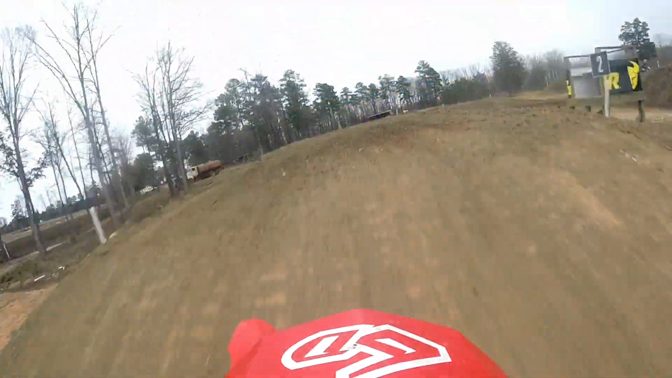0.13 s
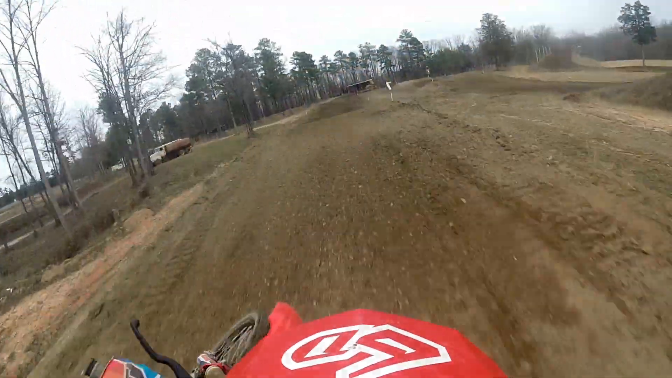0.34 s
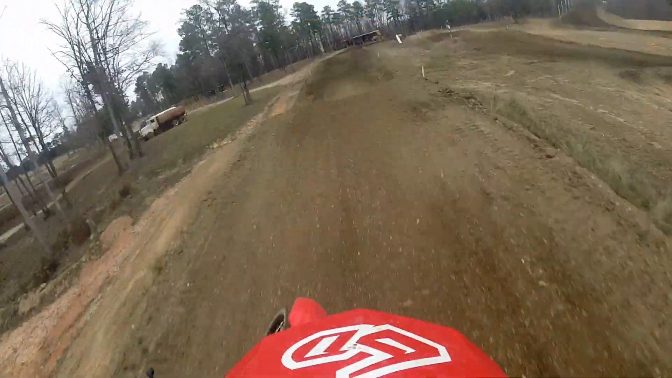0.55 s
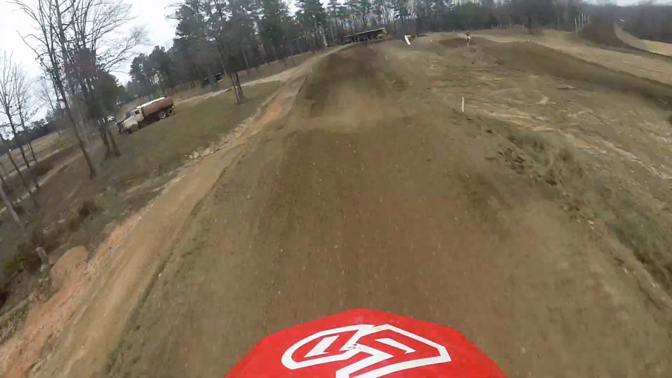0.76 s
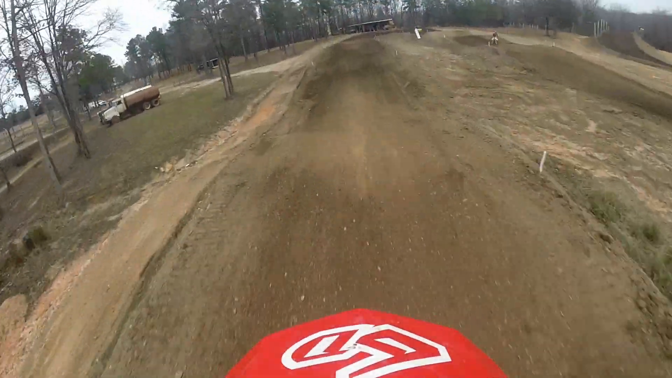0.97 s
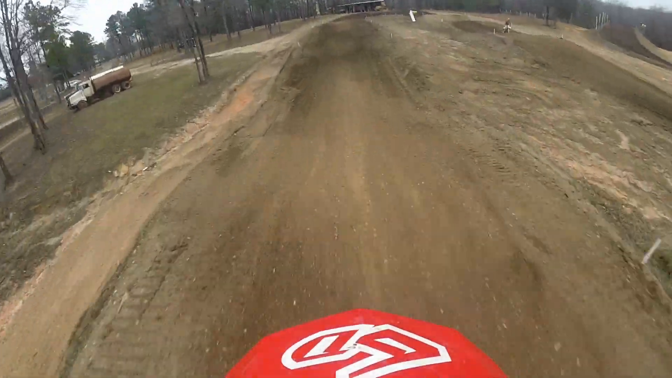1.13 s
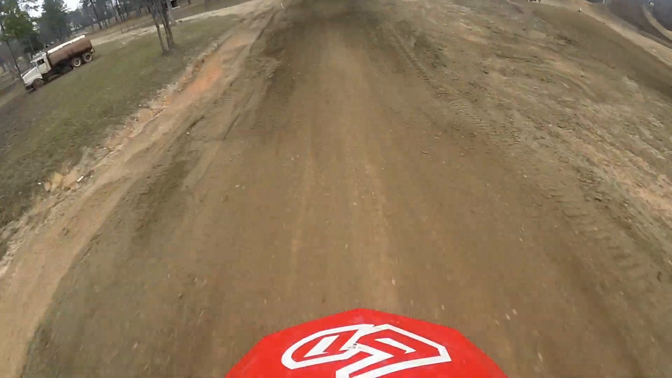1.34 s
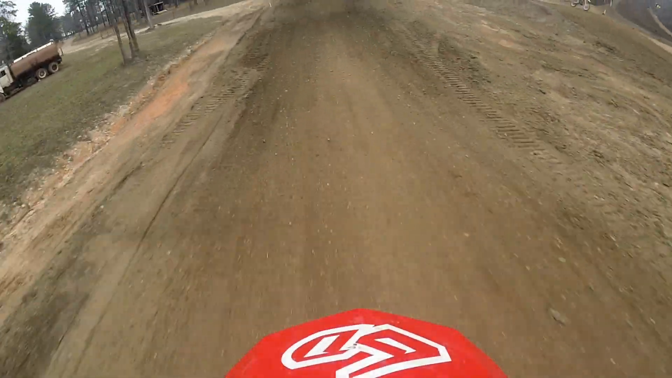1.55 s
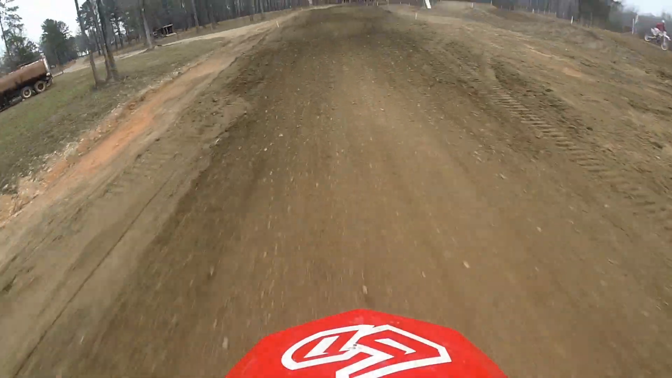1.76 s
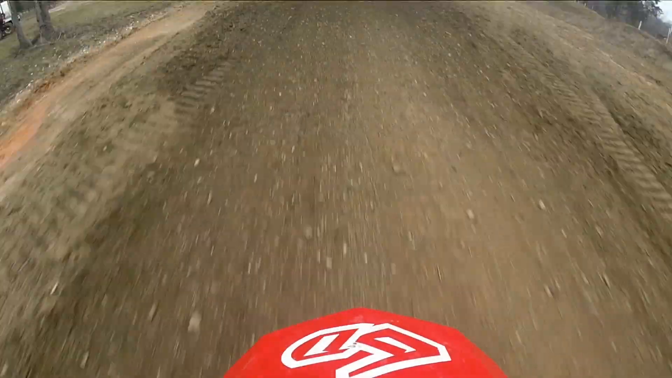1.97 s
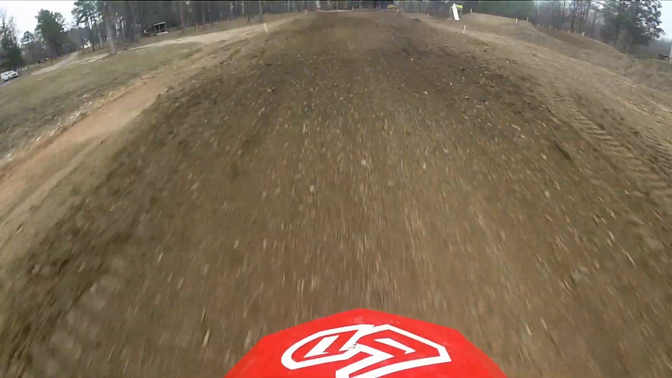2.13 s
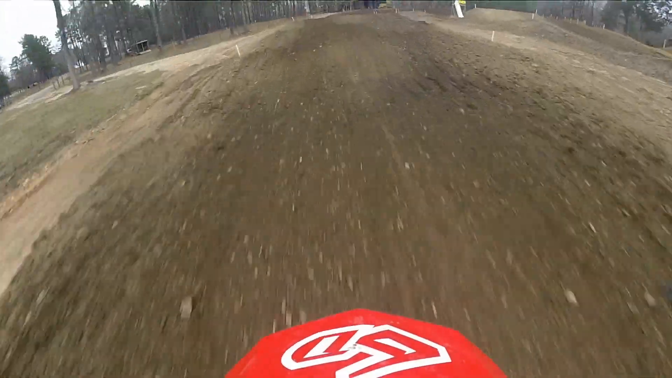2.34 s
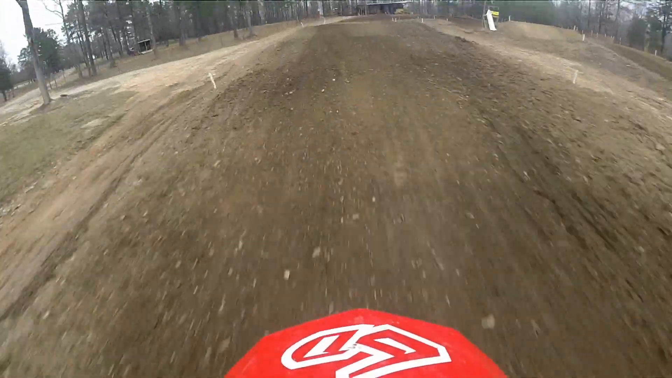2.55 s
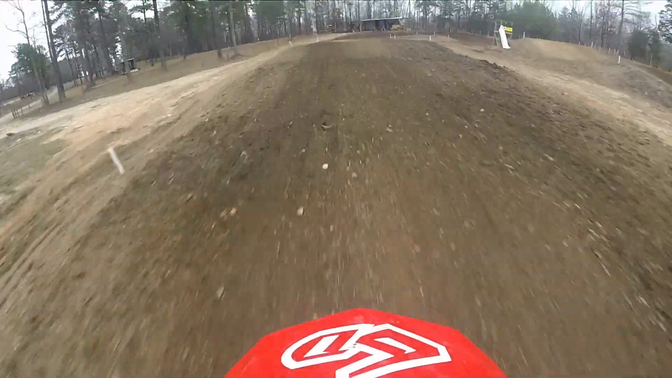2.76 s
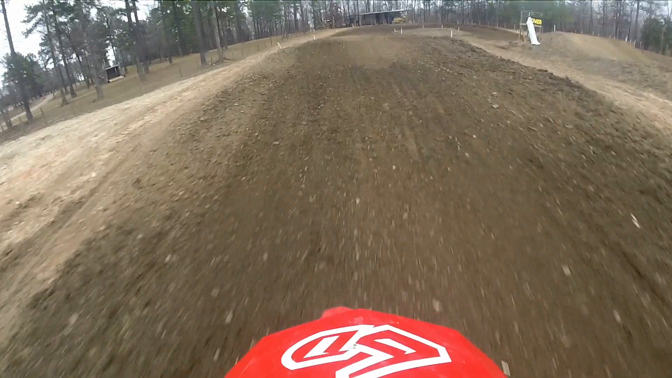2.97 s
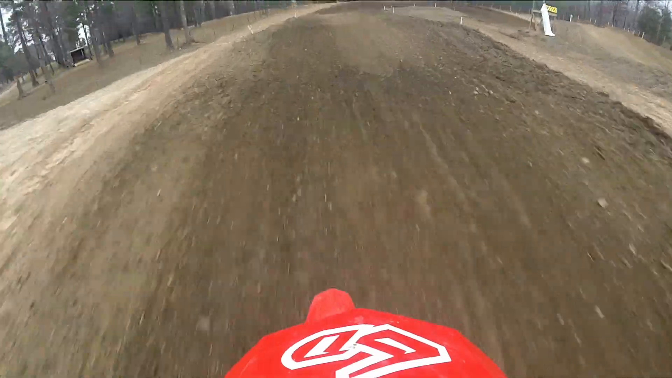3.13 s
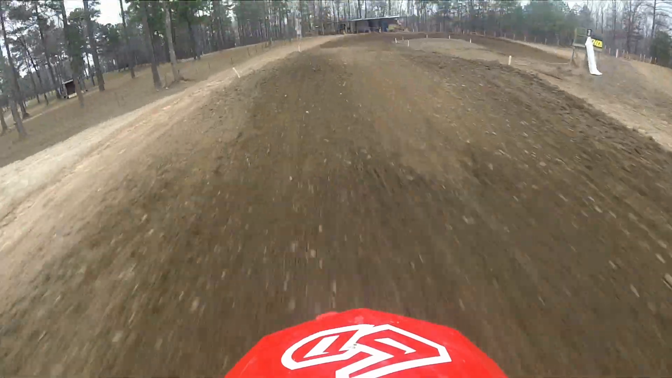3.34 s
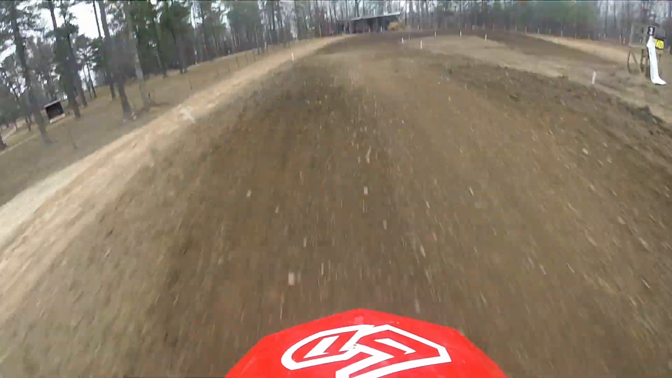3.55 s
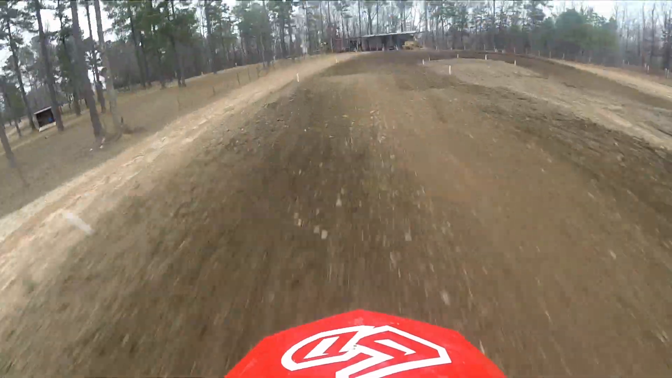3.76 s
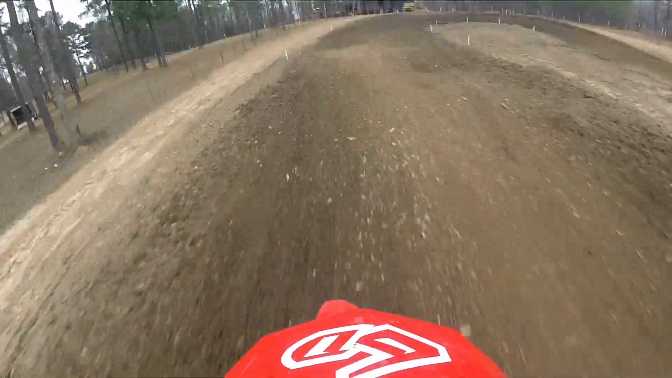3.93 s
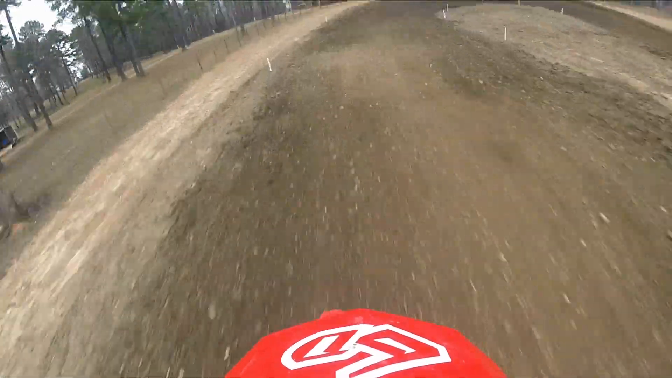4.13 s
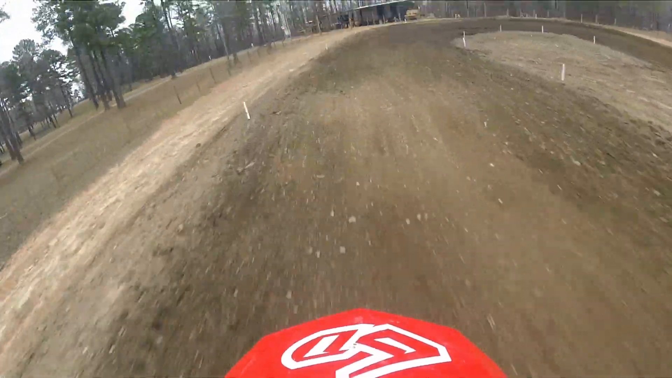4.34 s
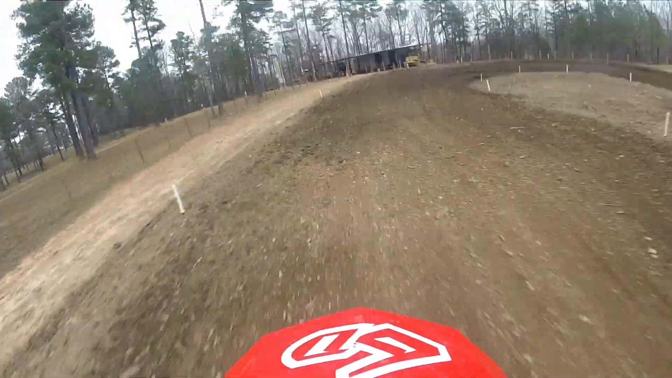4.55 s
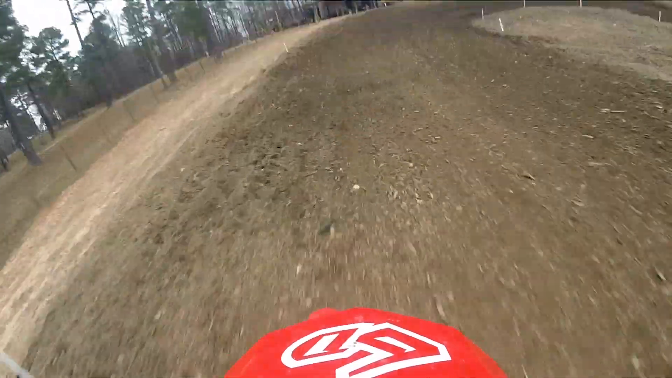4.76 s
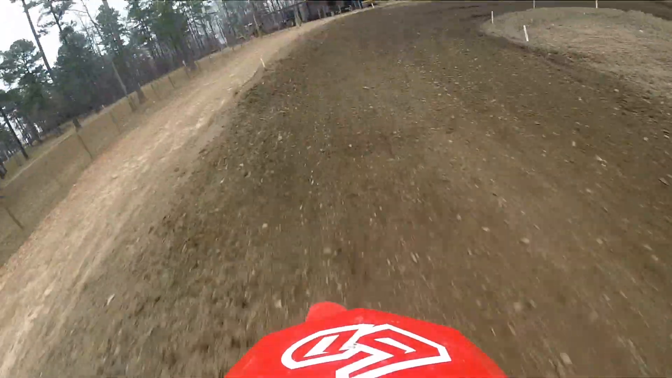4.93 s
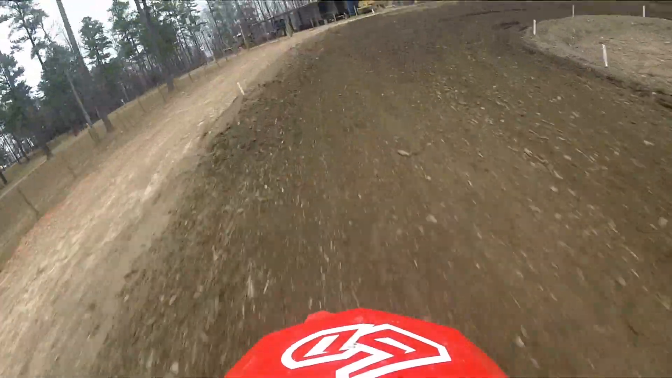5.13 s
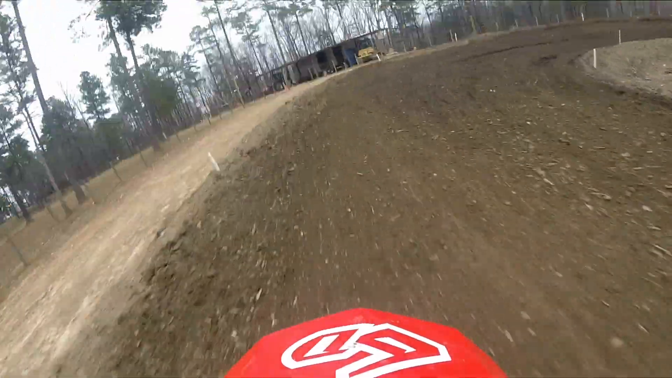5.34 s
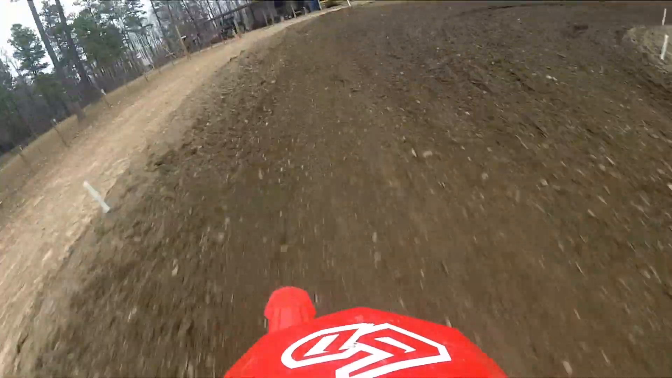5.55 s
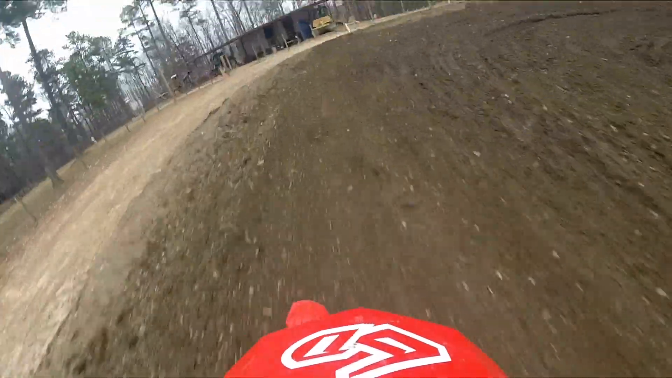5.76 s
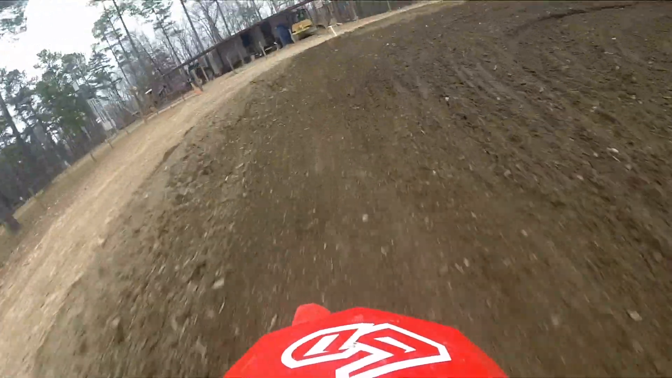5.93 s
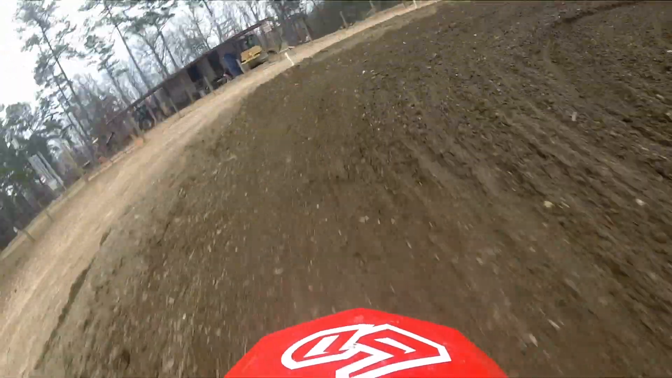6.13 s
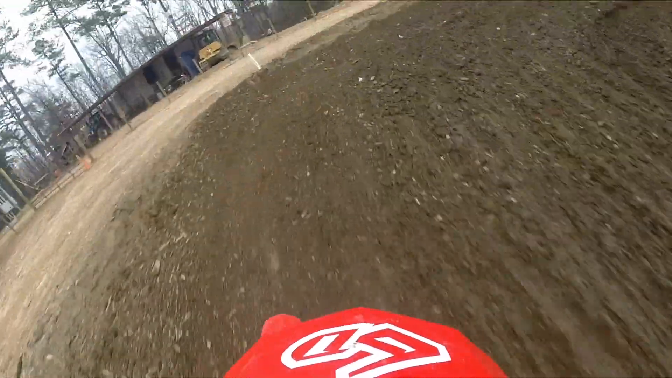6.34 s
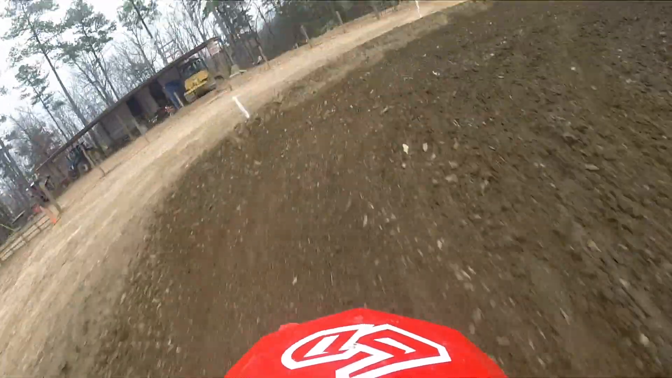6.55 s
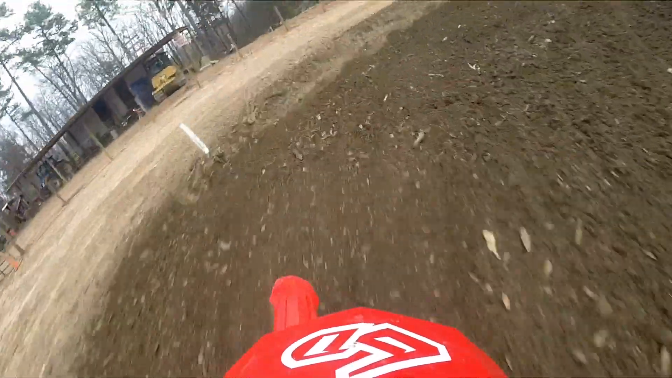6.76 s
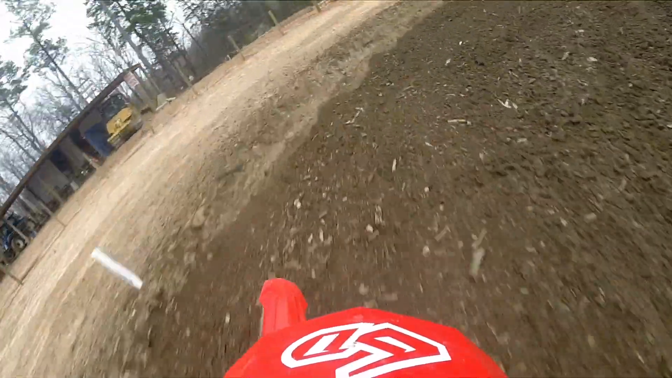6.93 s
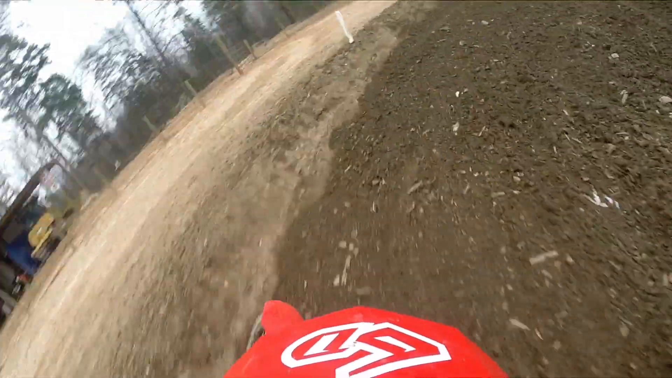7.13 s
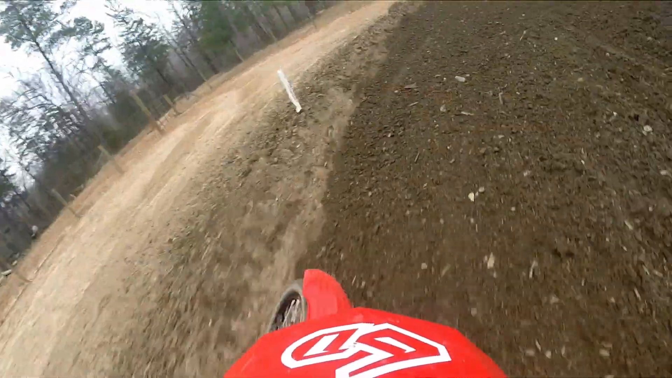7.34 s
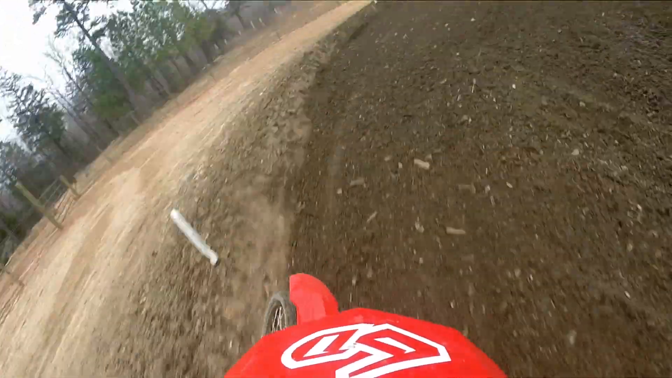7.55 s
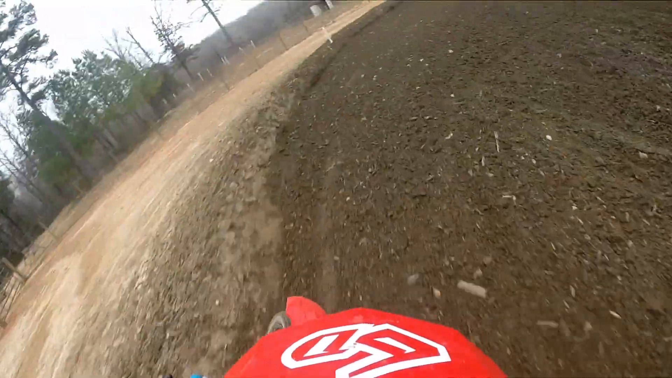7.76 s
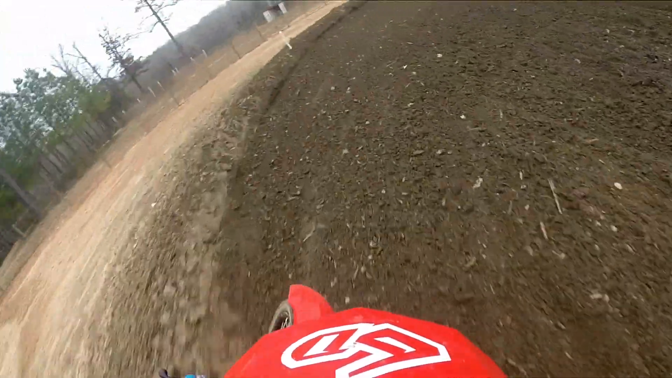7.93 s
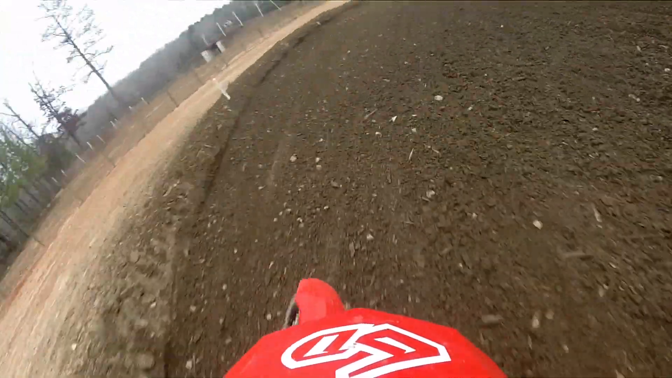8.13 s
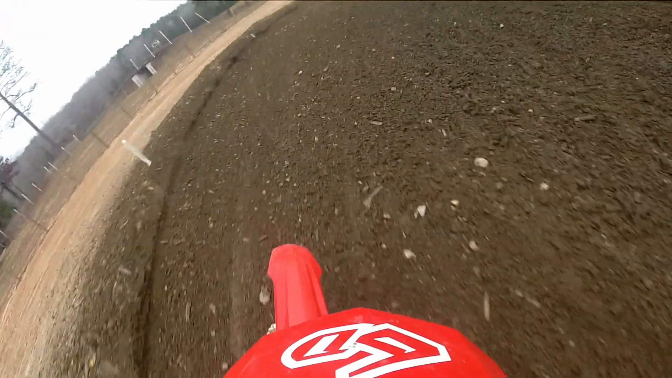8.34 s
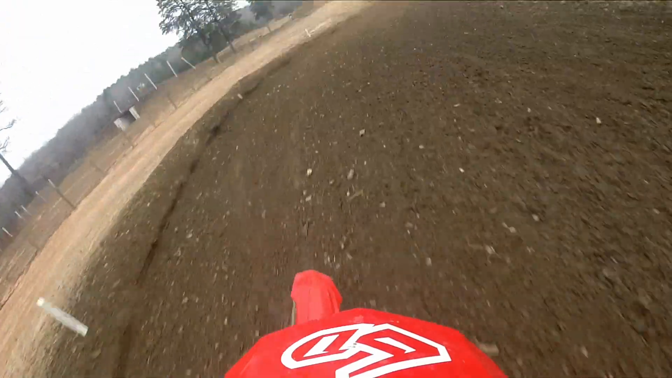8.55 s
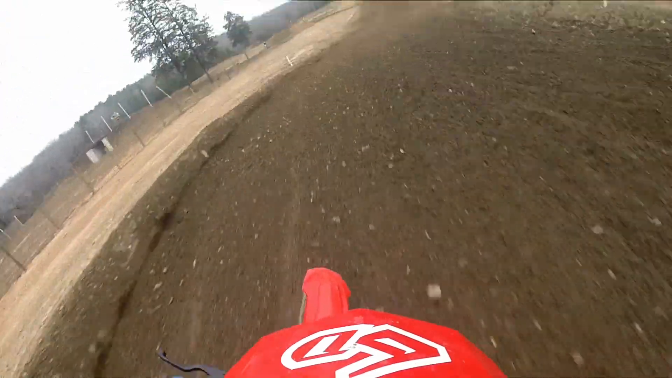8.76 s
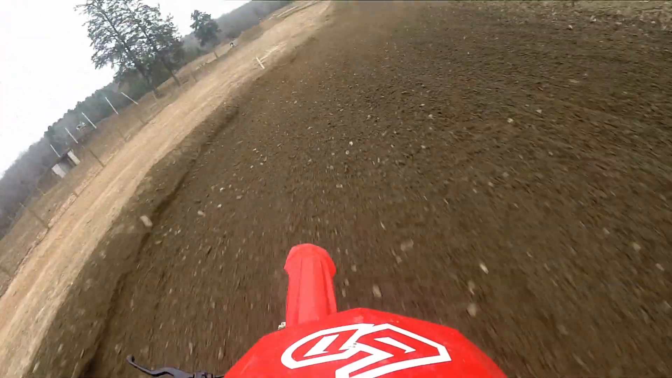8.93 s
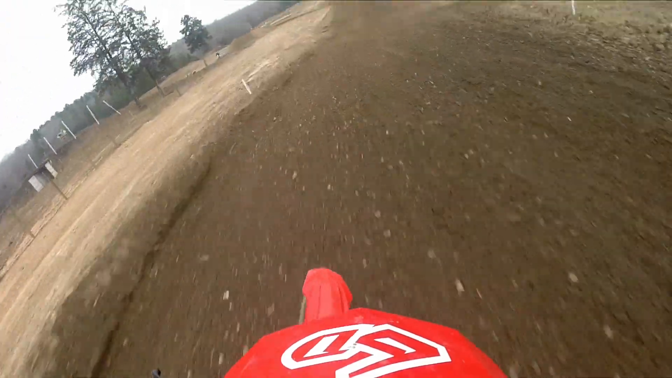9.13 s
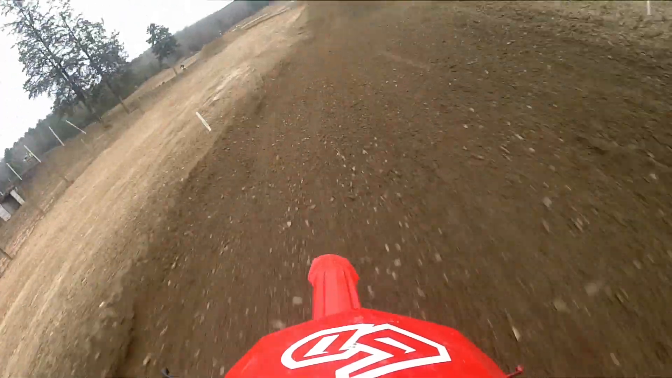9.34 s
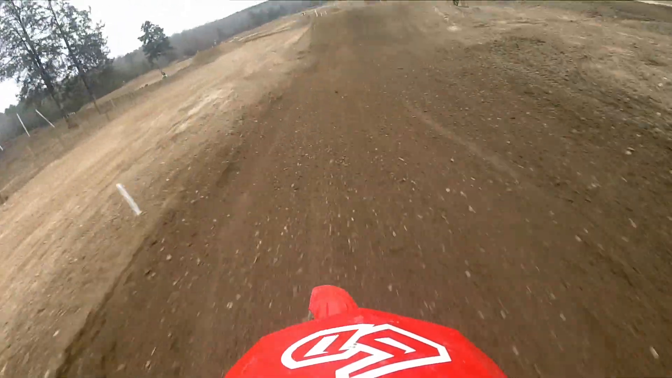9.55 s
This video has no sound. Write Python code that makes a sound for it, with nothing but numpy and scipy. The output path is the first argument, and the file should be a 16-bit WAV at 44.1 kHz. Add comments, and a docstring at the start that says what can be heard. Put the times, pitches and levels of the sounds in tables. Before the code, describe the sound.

A single-cylinder four-stroke motocross bike on a dirt track is heard close, from the rider's helmet. From the start the engine drones with falling revs and rattling valves, while air and tyres hiss and wind gusts rumble. At 0.8 seconds it gives a short, crackling blip in mid-air. From 1.3 to 3.7 seconds it revs high in quick repeated pulls, each with an exhaust bark and a hollow intake honk. Bumps make low thumps near 1.8, 2.9, 3.8 and 4.6 seconds. From about 4 seconds the bike coasts into a bend, burbling low with light throttle blips, and the hiss fades after 5.5 seconds. More thumps come around 6.2, 6.6 and 8.4 seconds, and faint grit ticks on the helmet a few times between 6 and 9. From about 8 seconds the engine lugs out in stronger surges through a heavy gust, climbing until the end near 9.7 seconds.

```python
"""A single-cylinder four-stroke motocross bike on a dirt track, heard from the rider's helmet.
From the start the pipe drones with revs and throttle, valves rattle, air and tyres hiss and gusts rumble.
At 0.8 s the bike blips in the air and crackles. It pulls over the rollers: each pull makes the exhaust
bark and the airbox honk, and bumps thump the helmet. From about 4 s it coasts into a bend, grit ticks
on the shell after 6 s, and from about 8 s the engine lugs out of the bend."""
import sys
import numpy as np
from scipy import signal
from scipy.fft import rfft, irfft, next_fast_len
from scipy.io import wavfile
from scipy.ndimage import uniform_filter1d

SR = 44100
rng = np.random.default_rng(int(sys.argv[2]) if len(sys.argv) > 2 else 0)


def file_out(sig):
    """Save sig as 16-bit WAV at sys.argv[1]."""
    # one column per channel
    cols = np.atleast_2d(sig).T
    # limit, then scale
    lim = np.clip(cols, -1, 1)
    pcm = np.round(lim * 32767).astype(np.int16)
    wavfile.write(sys.argv[1], SR, pcm)


N = 427329
T = np.arange(N) / SR
FFT_SIZE = next_fast_len(N + SR)
FREQ_HZ = np.maximum(np.arange(FFT_SIZE // 2 + 1) * SR / FFT_SIZE, 1e-3)


def undb(db):
    """Decibels to gain."""
    return 10 ** (np.asarray(db) / 20)


def curve(table, column=1, at=T):
    """One column interpolated against the first, by default over time."""
    rows = np.array(table, float)
    return np.interp(at, rows[:, 0], rows[:, column])


def swell(start, length, attack, release):
    """Envelope that rises, holds and falls; times in seconds."""
    return np.clip((T - start) / attack, 0, 1) * np.clip(1 - (T - start - length) / release, 0, 1)


def noise():
    """White noise of unit power."""
    return rng.standard_normal(N)


def wander(rate_hz):
    """Smooth random motion with a spread near 1."""
    knots = rng.standard_normal(4000)
    return 1.4 * np.interp(T * rate_hz, np.arange(len(knots)), knots)


def modes(table, order=1):
    """Response of (Hz, width Hz, dB) resonances; above order 1 each swells before it fades."""
    return sum(undb(db) / (1 + 1j * (FREQ_HZ / hz - hz / FREQ_HZ) * hz / width) ** order
               for hz, width, db in table)


def colour(spectrum):
    """Causal response through (Hz, dB) points."""
    hz, db = np.transpose(spectrum)
    gain = undb(np.interp(np.log(FREQ_HZ), np.log(hz), db))
    cepstrum = irfft(np.log(gain), FFT_SIZE)
    return np.exp(rfft(2 * cepstrum[:FFT_SIZE // 2], FFT_SIZE) - cepstrum[0])


def through(x, response):
    """Filter that keeps the power of a white input."""
    return irfft(rfft(x, FFT_SIZE) * response, FFT_SIZE)[:N] / np.sqrt(np.mean(abs(response) ** 2))


def steady(x):
    """Hold unit power over a few engine cycles."""
    window = SR // 10
    power = uniform_filter1d(uniform_filter1d(x * x, window), window)
    return x / np.sqrt(power + 1e-12)


def clicks(times, sizes):
    """Impulses at times in seconds."""
    return np.bincount(np.clip(np.asarray(times) * SR, 0, N).astype(int), sizes, N + 1)[:N]


# Each row: time in seconds, firing rate in Hz.
FIRING_HZ = [(0.0, 69.8), (0.28, 61.1), (0.83, 37.27), (0.94, 66), (1.06, 64.3), (1.34, 53.14),
             (1.61, 91.1), (1.72, 98.8), (1.82, 63.64), (1.97, 65.23), (2.03, 67.2), (2.41, 67.38),
             (2.84, 88.2), (2.98, 62.4), (3.09, 77.6), (3.31, 74.3), (3.48, 62.66), (3.67, 91.75),
             (3.79, 61.57), (4.18, 45.24), (4.44, 38.77), (4.52, 39.74), (4.73, 50.24), (4.99, 35.37),
             (5.28, 27.95), (5.44, 45.3), (5.77, 29.8), (6.18, 26.41), (6.4, 53.47), (6.64, 36.61),
             (7.09, 23.74), (7.3, 49.8), (7.56, 25), (7.89, 56.87), (8.02, 36.06), (8.11, 36.29),
             (8.39, 35.37), (8.45, 39.93), (8.74, 44.3), (8.84, 39.38), (9.03, 40.68), (9.22, 53.28),
             (9.41, 46.52), (9.58, 56.4), (9.69, 64.7)]


def engine_cycles(revs_hz):
    """Cycle count, whole at each firing. Slow running stumbles; the flywheel evens out fast running."""
    stumble = .008 * (40 / revs_hz) ** 3 * wander(30)
    return np.cumsum(revs_hz) / SR + stumble


def strokes(cycle, phase, scatter_db):
    """One pulse a cycle. The scatter holds at 50 Hz; slower running burns less evenly."""
    chance = rng.standard_normal(1000)
    counts = np.arange(int(cycle[-1]))
    times = np.interp(counts + phase, cycle, T)
    period_s = np.gradient(times)
    uneven_db = scatter_db * (50 * period_s) ** 1.5 * chance[counts]
    return clicks(times, np.sqrt(period_s * SR) * undb(uneven_db))


def puffs(cycle, phase, decay):
    """Unit-power noise that swells and dies once a cycle; phase and decay in cycles."""
    age = ((cycle - phase) % 1) / decay
    gate = age * np.exp(-age)
    return noise() * gate / np.sqrt(np.mean(gate ** 2))


# Each row: start, length and attack in seconds, opening 0-1, then relative levels in dB of
# exhaust bark, airbox honk, pulse sharpness, spit of gas and upper airbox mode.
THROTTLE_PULLS = [(0.818, 0.12, .03, 0.56, -41.5, -43, -5.5, 3.5, -0.5),
                  (1.347, 0.23, .06, 1, -35.5, -42.5, -10, -19, -2),
                  (1.583, 0.17, .03, 0.9, -44, -39, -2.5, -25, 7),
                  (1.77, 0.33, 0.032, 0.96, -46.5, -38, -3, -18, 1.5),
                  (2.099, .3, 0.09, 0.9, -45.5, -38, -3, -2, -4),
                  (2.41, 0.26, 0.027, 0.65, -50, -52, -4, -5, -1),
                  (2.66, 0.16, 0.052, 0.93, -46.5, -41, -3, -6, 21),
                  (2.906, 0.17, .04, 0.96, -46, -41, -6, -12, -5.5),
                  (3.079, 0.26, .03, 0.75, -47.5, -48.5, -6.5, -10, -9),
                  (3.438, .13, 0.041, 1, -42, -36, 3, -18, 0),
                  (3.57, 0.092, 0.037, 1, -47, -37, 4.5, -18, 4),
                  (4.63, .24, .04, .2, -66, -52.5, -2, -5, 6),
                  (5.34, 0.23, 0.075, 0.29, -66, -61, 0, -3, 10),
                  (6.191, 0.36, 0.025, 0.42, -59, -52, 2, -4, 1.5),
                  (7.136, 0.089, .02, 0.67, -55.5, -47.5, -1, 0.5, 9),
                  (7.227, .16, 0.029, 0.3, -57, -52.5, 1.5, -4, 3),
                  (7.513, .23, 0.021, 0.47, -64, -48.5, 2, 2, 4),
                  (7.751, .18, 0.041, 1, -58, -46, 4.5, 0, -1),
                  (7.93, 0.29, 0.025, 0.83, -52, -39.5, 2.5, 1, -4),
                  (8.2, 0.26, .03, 1, -48.5, -37, -2.5, 2, -2),
                  (8.452, 0.302, 0.026, 1, -45.5, -35.5, 1, 0.5, -6),
                  (8.761, 0.27, 0.043, 0.99, -46, -38, -4, -1.5, -5.5),
                  (8.991, .27, .06, 1, -42, -35.5, -1, -4.5, -5.5),
                  (9.272, .23, 0.037, 0.97, -43, -36, 0.5, -5.5, -5.5),
                  (9.5, 0.27, .04, 0.89, -42.5, -40, 0.5, -8, -13)]
BARK, HONK, SHARPNESS, SPIT, UPPER_MODE = range(4, 9)
RELEASE_S = 0.038


def throttle():
    """Throttle opening, 0-1."""
    pulls = sum(opening * swell(start, length, attack, RELEASE_S)
                for start, length, attack, opening, *_ in THROTTLE_PULLS)
    return np.clip(pulls, 0, 1)


def pull_gain(column, crest, arch_db=2):
    """Gain that arches over each pull; crest is the share of the pull where the arch peaks."""
    gain = np.zeros(N)
    for row in THROTTLE_PULLS:
        start, length, attack = row[:3]
        progress = (T - start) / (length + RELEASE_S)
        droop_db = arch_db * np.minimum((2 * (progress - crest)) ** 2, 2)
        gain += undb(row[column] - droop_db) * swell(start, length, attack, RELEASE_S)
    return gain


def pull_tone(column):
    """Gain that colours each pull, gliding from one to the next."""
    return undb(curve([(row[0] + row[1] / 2, row[column]) for row in THROTTLE_PULLS]))


# Throttle shut. Each row: firing rate in Hz, relative levels in dB of pipe, can, cases and airbox.
COASTING_LEVELS = [(26.88, -61.5, -61.5, -71, -70), (33.6, -56.5, -62.5, -69, -65.5),
                   (45.7, -50, -63.5, -67, -58.5), (56, -55.5, -63, -64, -59), (67, -65.5, -71, -65, -57)]
# Throttle open. Each row: firing rate in Hz, relative dB of pipe, can and cases, idle-turn kick 0-1.
PULLING_LEVELS = [(32.985, -60, -57.5, -52.5, 0.14), (43.02, -59, -54, -51, 0.3),
                  (52, -62, -52.5, -55, 0.1), (66, -54, -64, -55, 0), (82, -46.5, -61, -51, 0.36)]
# Pipe and engine cases. Each row: frequency in Hz, gain in dB.
PIPE_SPECTRUM = [(50, -44.5), (95, -21.5), (122, 3), (143, 6.5), (168, 2.5), (210, -6.5), (300, -10.5),
                 (500, -49.5), (2000, -86)]
CASES_SPECTRUM = [(150, -47), (380, -4.5), (470, 3), (550, 2.5), (750, 0.5), (900, -2.5), (1300, -2),
                  (5000, -87)]
# Silencer can. Each row: frequency in Hz, width in Hz, gain in dB.
CAN_MODES = [(87.7, 42, 0)]


def drone(cycle, revs_hz):
    """Firings shake pipe, can and cases, burbling at low revs; the idle crank turn kicks too."""
    firing = strokes(cycle, phase=0, scatter_db=1.3)
    idle_turn = strokes(cycle, phase=.5, scatter_db=1.3)
    beat = firing + curve(PULLING_LEVELS, column=4, at=revs_hz) * idle_turn
    burble = (50 / revs_hz) ** 2 * noise()
    pipe = steady(through(beat + .12 * burble, colour(PIPE_SPECTRUM)))
    can = steady(through(firing + .2 * burble, modes(CAN_MODES, order=2)))
    spread = np.exp(-1j * np.pi * FREQ_HZ ** 2 * 6e-6)  # higher tones trail in the frame
    cases = steady(through(beat + .5 * burble, colour(CASES_SPECTRUM) * spread)) * undb(1.5)
    opening = throttle()
    mix = np.zeros(N)
    for column, part in enumerate((pipe, can, cases), start=1):
        shut_db = curve(COASTING_LEVELS, column, at=revs_hz)
        open_db = curve(PULLING_LEVELS, column, at=revs_hz)
        mix += part * undb((1 - opening) * shut_db + opening * open_db)
    return mix


# Airbox. Each row: frequency in Hz, width in Hz, gain in dB.
AIRBOX_LOW_MODES = [(269.6, 102, 1)]
AIRBOX_HIGH_MODES = [(324, 99, 0)]


def intake(cycle, revs_hz, tuned_hz=67.4, span_hz=20, fade_db=9):
    """The airbox rings low as the valve opens, higher as it shuts; revs past its tuning fade the honk."""
    air = .12 * (50 / revs_hz) ** 1.5 * noise()
    opens = strokes(cycle, phase=.5, scatter_db=.7) + air
    shuts = strokes(cycle, phase=.88, scatter_db=.7) + air
    low = through(opens, modes(AIRBOX_LOW_MODES, order=3))
    high = through(shuts, modes(AIRBOX_HIGH_MODES, order=3)) * pull_tone(UPPER_MODE)
    detuned = np.clip((revs_hz - tuned_hz) / span_hz, 0, 1)
    honk_gain = pull_gain(HONK, crest=.26) * undb(-fade_db * detuned)
    coast_gain = undb(curve(COASTING_LEVELS, column=4, at=revs_hz))
    return steady(low + high) * np.hypot(honk_gain, coast_gain) * undb(-1.86)


# Valve train. Each row: frequency in Hz, width in Hz, gain in dB.
VALVE_MODES = [(1930, 560, 6), (4530, 520, -6.5)]


def valves(cycle, revs_hz):
    """The valve train rattles on every crank turn, louder with the revs."""
    rattle = through(puffs(2 * cycle, phase=.45, decay=.34), modes(VALVE_MODES, order=2))
    return rattle * undb(-53.5) * (revs_hz / 50) ** 1.13


# Air and tyre hiss. Each row: time in seconds, relative level in dB.
RUSH_DB = [(0, -42.5), (.45, -45), (.8, -42.5), (.98, -46.5), (1.5, -43.5), (1.9, -40.5), (2.06, -45.5),
           (2.25, -41.5), (2.48, -43.5), (2.86, -38.5), (3.13, -44), (3.42, -39), (3.58, -42.5),
           (3.78, -42), (3.95, -45.5), (4.2, -42.5), (4.36, -38.8), (4.5, -37.5), (4.71, -41), (4.87, -46),
           (5.12, -44.5), (5.38, -41), (5.62, -48), (6.17, -54), (6.45, -52), (6.6, -57), (7.1, -66.5),
           (7.3, -54), (7.48, -65.5), (7.85, -54), (8.3, -53), (8.6, -49), (9.69, -48.5)]
# The hiss and its broad bed. Each row: frequency in Hz, gain in dB.
HISS_SPECTRUM = [(410, -50.5), (700, -22), (1090, -15), (1420, -6), (1760, -4), (1910, -4), (2140, 1),
                 (2470, -0.5), (2700, -3), (3570, -9), (3810, -9.5), (4160, -21), (4900, -26.5),
                 (6370, -66), (10800, -120)]
BED_SPECTRUM = [(40, -12), (100, 10.5), (300, 6), (700, -1), (3000, -11), (5000, -7), (8000, -22.5),
                (15000, -46)]
# Visor edges. Each row: frequency in Hz, width in Hz, gain in dB.
VISOR_MODES = [(5320, 206, -4), (5640, 730, -12), (7010, 550, -17), (8830, 1840, -17), (10520, 810, -20.5),
               (11900, 600, -20.5)]


def rush():
    """Air and tyres hiss with speed; the visor's edges whistle."""
    flutter = undb(.48 * wander(25) + .32 * wander(90))
    hiss = through(noise(), colour(HISS_SPECTRUM)) * undb(4)
    bed = through(noise(), colour(BED_SPECTRUM)) * undb(-11)
    whistle = through(noise(), modes(VISOR_MODES) * modes([(6050, 1960, 0)]))
    rush_db = curve(RUSH_DB)
    whistle_db = -54 + 1.13 * (rush_db + 42.5)
    return flutter * (undb(rush_db) * (hiss + bed) + undb(whistle_db) * whistle)


# Gusts. Each row: start in seconds, length in seconds, relative level in dB.
WIND_GUSTS = [(-.05, .11, -40), (.64, 0.23, -42), (1.76, 0.22, -36.5), (2.0, 0.22, -44),
              (2.885, 0.18, -39.5), (3.361, 0.15, -38), (3.759, 0.24, -37.5), (4.048, .14, -42),
              (5.366, 0.17, -36), (6.18, 0.51, -44.5), (7.079, 0.39, -44), (8.119, .2, -41),
              (8.335, 0.42, -33), (8.74, .22, -42)]
# Helmet rumble. Each row: frequency in Hz, gain in dB.
HELMET_SPECTRUM = [(10, -5), (22, 11.5), (33, -7.5), (41, -1), (47, 11), (52, 6), (60, -17.5), (80, -21),
                   (150, -65.5)]


def wind(edge_s=.038):
    """Wind shakes the helmet on its padding, harder in gusts."""
    gusts = sum(undb(db) * swell(start, length, edge_s, edge_s) for start, length, db in WIND_GUSTS)
    lull = undb(-49.5)
    buffet = steady(through(noise(), colour(HELMET_SPECTRUM)))
    return buffet * np.hypot(lull, gusts) * undb(-3)


# Crackle at the pipe mouth. Each row: frequency in Hz, width in Hz, gain in dB.
CRACKLE_MODES = [(9300, 6000, 0)]


def crackle(cycle):
    """The blip in the air is hard enough that each firing cracks at the mouth of the pipe."""
    cracks = through(puffs(cycle, phase=0, decay=.07), modes(CRACKLE_MODES, order=2))
    return cracks * swell(start=.817, length=.1, attack=.05, release=RELEASE_S) * undb(-55)


# Silencer. Each row: frequency in Hz, width in Hz, gain in dB.
SILENCER_LOW_MODES = [(1333, 290, 3)]
SILENCER_HIGH_MODES = [(1110, 340, 1), (1766, 124, 13.5), (2086, 320, 7.5), (2880, 220, -5),
                       (3400, 250, -7), (4480, 260, -12)]
# Spit of gas. Each row: frequency in Hz, gain in dB.
SPIT_SPECTRUM = [(300, -34), (900, 3.5), (2500, 8.5), (4500, -3.5), (6000, -7.5), (8000, -21.5),
                 (13000, -32), (16000, -47)]


def exhaust(cycle):
    """A pressure pulse and a puff of gas ring the silencer; a sharp pulse wakes more of its modes."""
    blast = strokes(cycle, phase=0, scatter_db=.8) + .38 * puffs(cycle, phase=0, decay=.13)
    lag_s = np.interp(FREQ_HZ, [1400, 2300], [0, .0022])  # upper tones leave later: an upward chirp
    chirp = np.exp(-2j * np.pi * np.cumsum(lag_s) * SR / FFT_SIZE)
    low = through(blast, chirp * modes(SILENCER_LOW_MODES, order=2)) * undb(-3.5)
    high = through(blast, chirp * modes(SILENCER_HIGH_MODES, order=2)) * undb(3.5)
    spit = through(puffs(cycle, phase=0, decay=.075), colour(SPIT_SPECTRUM))
    return pull_gain(BARK, crest=.59) * (low + pull_tone(SHARPNESS) * high + pull_tone(SPIT) * spit)


# Bumps. Each row: start in seconds, relative level in dB.
TRACK_BUMPS = [(1.835, -34.5), (2.919, -28.5), (3.834, -29.5), (4.608, -30), (6.219, -37), (6.64, -32.5),
               (8.37, -28.5), (8.54, -41), (8.685, -36)]


def bumps(thump_hz=29):
    """Each bump jolts the helmet into a short, low thump."""
    thumps = np.zeros(N)
    for start, db in TRACK_BUMPS:
        age_s = np.maximum(T - start, 0)
        jolt = (age_s / .017 * np.exp(1 - age_s / .016)) ** 2
        thumps -= undb(db) * jolt * np.sin(2 * np.pi * thump_hz * age_s)
    return thumps


# Grit. Each row: time in seconds, relative level in dB.
GRIT_HITS = [(6.2625, -58), (6.6714, -56), (8.2385, -53), (8.4392, -55), (8.7195, -59), (8.8796, -58)]


def grit():
    """Grit ticks on the helmet's shell."""
    times, db = np.transpose(GRIT_HITS)
    shell = modes([(8760, 5000, 0), (13000, 2500, -3)], order=2)
    return through(clicks(times, undb(db)), shell) * undb(9)


def scene():
    """Mono mix; all engine sounds follow one cycle count."""
    revs_hz = curve(FIRING_HZ)
    cycle = engine_cycles(revs_hz)
    engine = exhaust(cycle) + crackle(cycle) + intake(cycle, revs_hz)
    engine += drone(cycle, revs_hz) + valves(cycle, revs_hz)
    return (engine + rush() + wind() + bumps() + grit())[None]


def record(dry):
    """The helmet camera cuts the treble steeply."""
    cutoff_hz = 15200
    return signal.sosfilt(signal.ellip(10, .2, 80, cutoff_hz, fs=SR, output="sos"), dry)


dry = scene()
out = record(dry)
file_out(out)
```